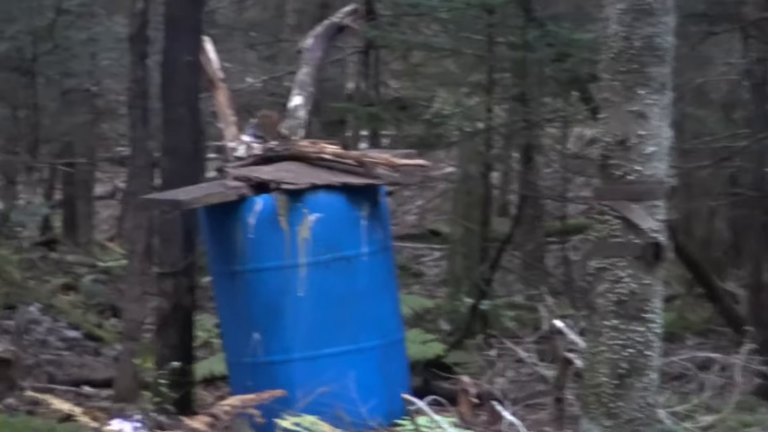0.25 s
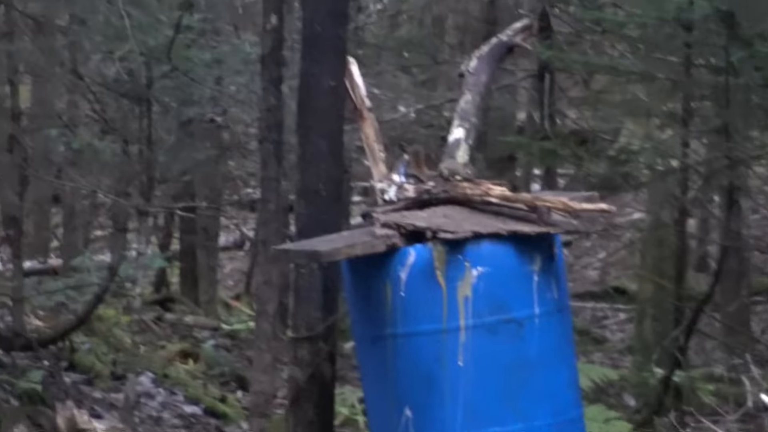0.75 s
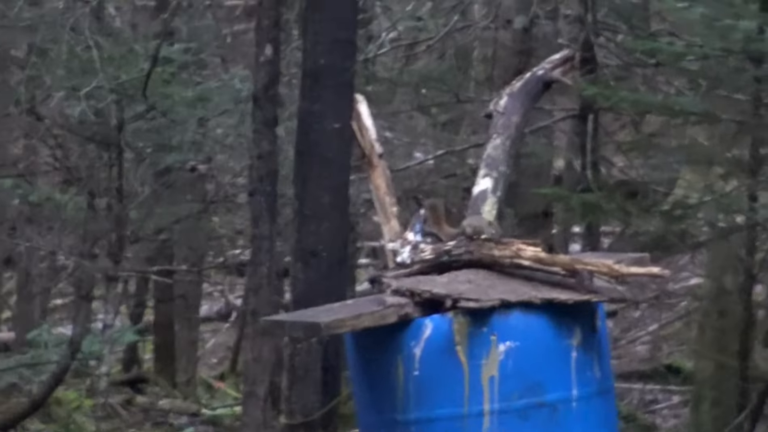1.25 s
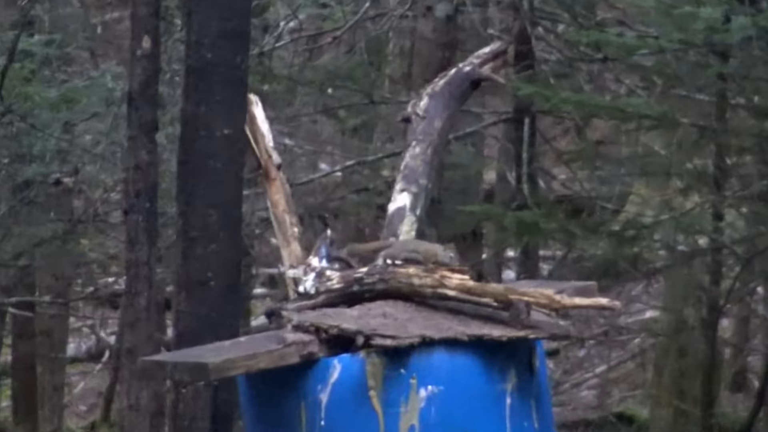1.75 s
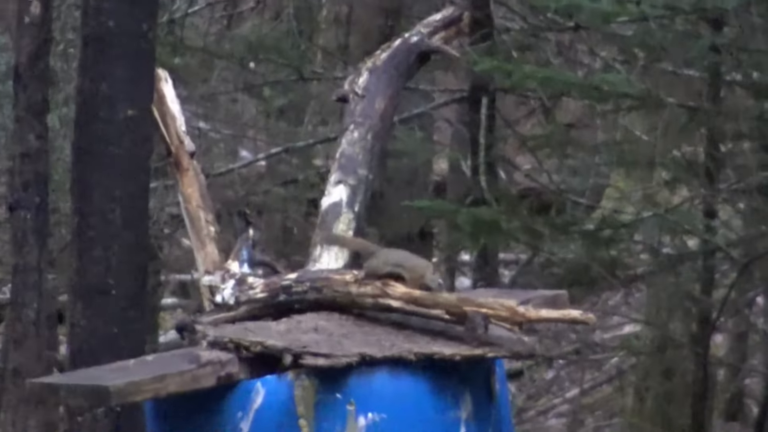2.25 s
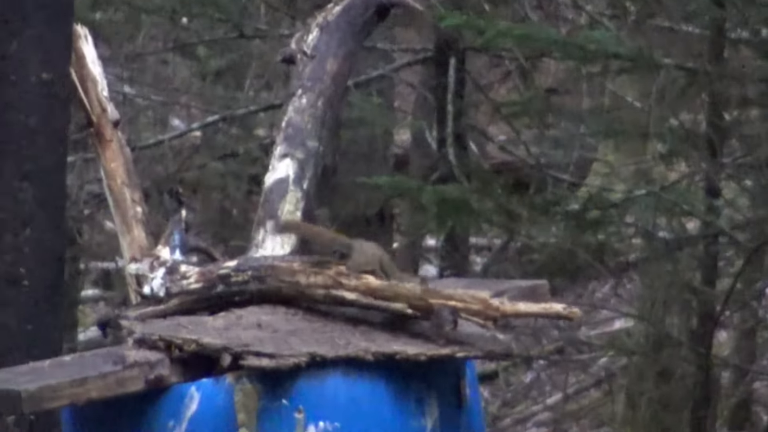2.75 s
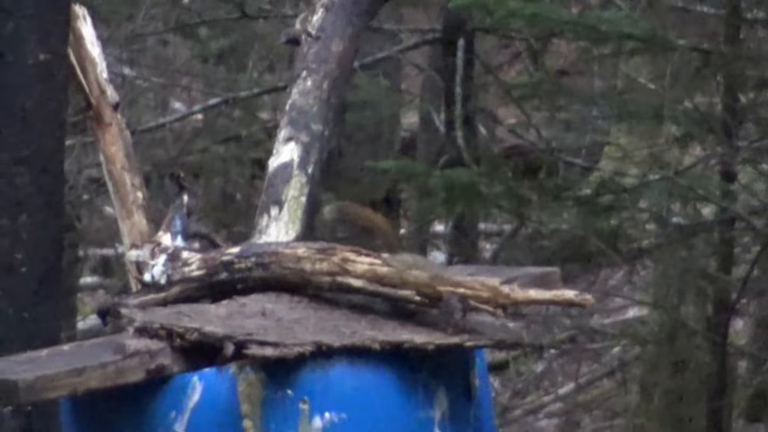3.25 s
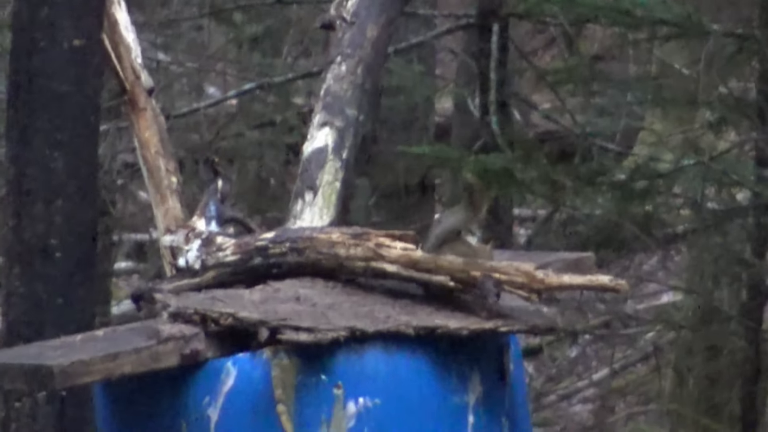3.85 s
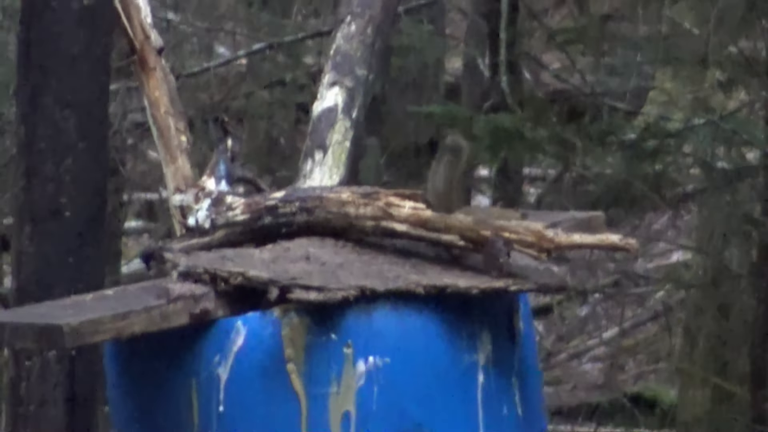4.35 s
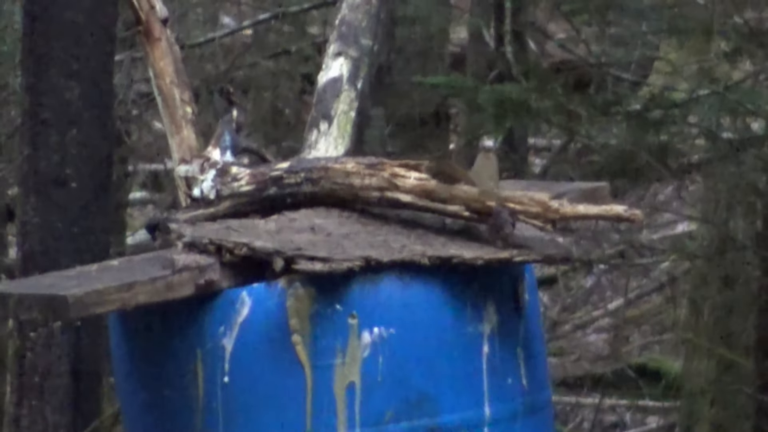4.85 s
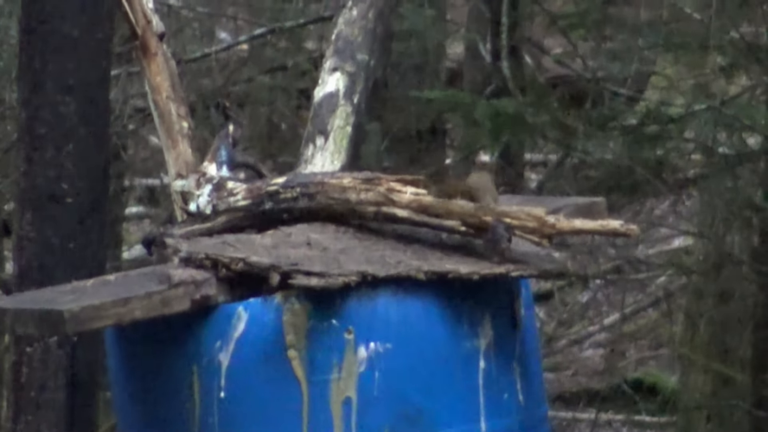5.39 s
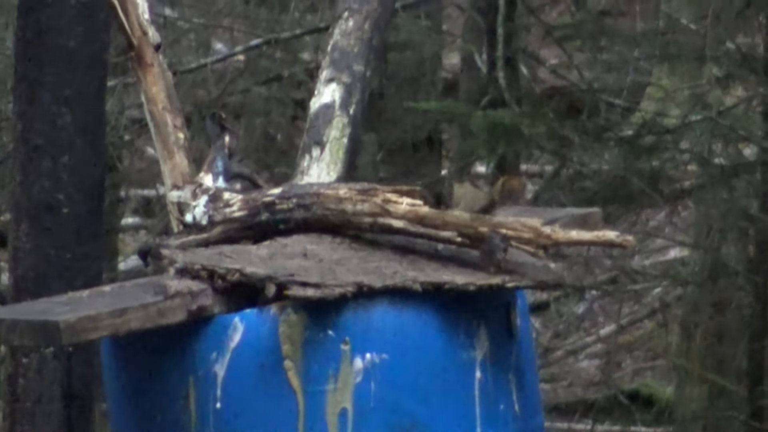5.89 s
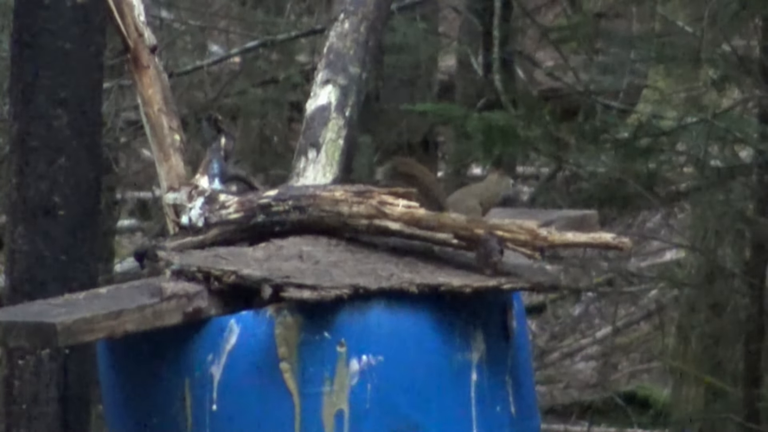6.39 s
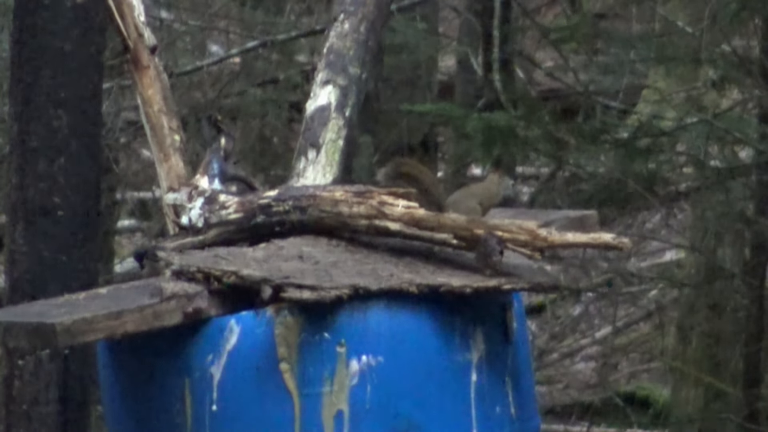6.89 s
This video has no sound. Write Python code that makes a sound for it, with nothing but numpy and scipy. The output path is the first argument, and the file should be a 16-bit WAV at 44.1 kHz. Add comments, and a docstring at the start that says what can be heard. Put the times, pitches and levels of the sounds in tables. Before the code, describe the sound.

Low wind rumble and occasional buffets hit a hand-held microphone over a faint forest hush. A nearby squirrel sounds five short, piercing alarm chirps, about one every second and a half, each with a raspy edge and a brief echo. A second squirrel calls faintly from far off before each one. Light rustling and dull knocks sound close by after the first chirp, and the wind dies down toward the end.

```python
"""Wind rumbles and buffets on the microphone over the hush of a conifer wood; something rustles close by.
A red squirrel calls from far off, and a near one at a feeder gives five alarm chirps in turn with it.
Each chirp is an arched whistle that breaks into a short bark, turbulent air shaped by the throat's
resonances. Trunks and twigs scatter the calls back, and knocks ring the body of the hand-held camera."""
import sys
import numpy as np
from scipy import signal
from scipy.fft import rfft, irfft, next_fast_len
from scipy.io import wavfile
from scipy.ndimage import uniform_filter1d

SR = 44100
rng = np.random.default_rng(int(sys.argv[2]) if len(sys.argv) > 2 else 0)


def to_wav(s):
    """Save 16-bit WAV."""
    ch = np.atleast_2d(s).T  # columns
    pcm = np.round(np.clip(ch, -1, 1) * 32767)  # PCM
    wavfile.write(sys.argv[1], SR, pcm.astype(np.int16))


N = 314433
TIME = np.arange(N) / SR


def amp(db):
    """Amplitude ratio of a level in decibels."""
    return 10 ** (np.asarray(db) / 20)


def unit_rms(x):
    """Normalisation to unit power."""
    return x / np.sqrt(np.mean(x ** 2) + 1e-20)


def curve_at(points, hz):
    """Interpolation on a logarithmic frequency axis."""
    f, value = np.transpose(points)
    return np.interp(np.log(hz + 1), np.log(f), value)


def add(mix, start_s, sound):
    """Superposition: a sound adds to the mix from its start time."""
    part = mix[max(round(start_s * SR), 0):][:len(sound)]
    part += sound[:len(part)]


def noise(spectrum):
    """Spectral shaping: white noise takes on a colour, at unit power."""
    size = next_fast_len(N)
    gain = amp(curve_at(spectrum, np.fft.rfftfreq(size, 1 / SR)))
    return unit_rms(irfft(rfft(rng.standard_normal(size)) * gain, size)[:N])


def wobble(size, rate_hz):
    """Random modulation: straight lines join Gaussian values drawn at the given rate."""
    return np.interp(np.arange(size) * rate_hz / SR, np.arange(4096), rng.standard_normal(4096))


# Spectra of the wind's rumble and flutter. Each row: frequency in Hz, relative density in dB.
RUMBLE_SPECTRUM = [(6, -30), (15, -2.5), (24, 0), (34, 0.5), (44, -5), (55, -11), (70, -31.5), (100, -36),
                   (150, -45), (300, -73), (1000, -100)]
FLUTTER_SPECTRUM = [(30, -44), (60, 3), (100, 2), (160, -5), (300, -24.5), (700, -43), (3000, -114)]
# The breeze, dying down towards the end. Each row: time in seconds, rumble level in dB.
BREEZE_LEVELS = [(0, -19.5), (1.6, -21.5), (1.8, -27.5), (2.05, -20.5), (5.15, -23), (5.7, -31.5),
                 (6.5, -32), (7.13, -41.5)]
# Gusts. Each row: peak time in seconds, rise above the breeze in dB, half width in seconds.
WIND_GUSTS = [(.25, 6, 0.048), (.46, 6.5, 0.034), (1.4, 2.5, 0.094), (2.42, 3, 0.16), (3.129, 7, 0.078),
              (4.85, 8.5, 0.23)]


def wind(flutter_db=-43, flutter_exponent=2.3, unrest_db=0.73):
    """Turbulence: eddies on the microphone swell with each gust, the flutter faster than the rumble."""
    gusts_db = sum(db * np.exp(-((TIME - s) / width) ** 2) for s, db, width in WIND_GUSTS)
    level_db = np.interp(TIME, *np.transpose(BREEZE_LEVELS)) + gusts_db + unrest_db * wobble(N, 8.8)
    eddies = noise(RUMBLE_SPECTRUM)
    eddies /= np.sqrt(uniform_filter1d(eddies ** 2, size=5000) + 1e-6)  # evens out chance swells
    flutter = amp(flutter_db + flutter_exponent * (level_db + 15.5)) * noise(FLUTTER_SPECTRUM)
    return amp(level_db) * eddies + flutter


# Likeness of left and right. Each row: frequency in Hz, correlation from 0 to 1.
CAPSULE_CORRELATION = [(100, 1), (500, 0.96), (3000, 0.97), (6000, 0.77), (14000, 0.44)]


def stereo_noise(spectrum):
    """Partial coherence: two close capsules receive nearly the same noise, less so in the treble."""
    size = next_fast_len(N)
    same = np.clip(curve_at(CAPSULE_CORRELATION, np.fft.rfftfreq(size, 1 / SR)), 0, 1)
    mid = irfft(rfft(noise(spectrum), size) * np.sqrt((1 + same) / 2), size)[:N]
    side = irfft(rfft(noise(spectrum), size) * np.sqrt((1 - same) / 2), size)[:N]
    return np.array([mid + side, mid - side])


# The wood's hush and the microphone's hiss. Each row: frequency in Hz, relative density in dB.
HUSH_SPECTRUM = [(20, -12.5), (70, -10.5), (97, -8), (145, -21.5), (300, -24), (650, -28.5), (1100, -32),
                 (1400, -36), (1900, -32.5), (3150, -32), (4000, -50.5), (6000, -61)]
HISS_SPECTRUM = [(1000, 0), (7500, 0), (11000, -4), (16000, -5.5)]


def hush_and_hiss(hush_db=-39, hiss_db=-53.8, flicker_db=.8):
    """Noise floor: the hush of the wood, a little to the right, adds to the microphone's self-noise."""
    hush = amp(hush_db + flicker_db * wobble(N, 12)) * stereo_noise(HUSH_SPECTRUM)
    return hush * amp([[-.6], [.6]]) + amp(hiss_db) * stereo_noise(HISS_SPECTRUM)


# Crackle and clicks at the microphone. Each row: frequency in Hz, relative density in dB.
CRACKLE_SPECTRUM = [(100, 5), (600, 7.5), (1300, -6), (2200, 4), (3600, -7), (6000, -6.5), (10000, -15),
                    (15000, -43)]
# Buffets. Each row: peak time in seconds, peak in dB, half width in seconds, flutter and crackle in dB.
WIND_BUFFETS = [(0.232, -14.5, 0.0039, -28.5, -80), (0.277, -6, 0.0042, -29, -75),
                (2.437, -15, 0.023, -26.5, -33), (3.12, -10, 0.0029, -22, -36),
                (3.717, -7.5, 0.0019, -22, -58), (3.749, -13, 0.0037, -25, -68),
                (3.798, -1.5, 0.0052, -24, -68), (4.799, -13, 0.01, -22.5, -69),
                (4.87, -22, 0.0021, -24.5, -36.5)]


def buffets(crackle_s=0.0097, flutter_s=0.011):
    """Pressure pulses: single pushes of air on the diaphragm, each with flutter and some with crackle."""
    out, crackle, flutter = np.zeros(N), noise(CRACKLE_SPECTRUM), noise(FLUTTER_SPECTRUM)
    for s, db, width, flutter_db, crackle_db in WIND_BUFFETS:
        span = abs(TIME - s) < .1
        t = TIME[span] - s
        push = amp(db) / (1 + (t / width) ** 2)
        shake = amp(flutter_db) * flutter[span] * np.exp(-abs(t) / flutter_s)
        out[span] += (push + shake) * np.hanning(len(t))
        out[span] += amp(crackle_db) * crackle[span] * np.exp(-abs(t) / crackle_s)
    return out


# Colour of a rustle. Each row: frequency in Hz, relative density in dB.
RUSTLE_SPECTRUM = [(500, -22), (2000, -11.5), (3500, -7.5), (7000, -1), (9500, -6.5), (12000, -13),
                   (16000, -27)]
# Rustles. Each row: peak time in seconds, level in dB, rough half width in seconds.
RUSTLE_SWELLS = [(.59, -56, 0.0057), (.78, -47, 0.069), (1.10, -47, 0.048), (1.373, -42.5, 0.014),
                 (1.442, -34, 0.011), (1.519, -53.5, 0.1), (2.72, -53.5, 0.17), (4.06, -50.5, 0.065),
                 (4.52, -74, 0.054), (5.63, -54.5, 0.018)]


def rustles(grain_db=3.0, spread=0.41):
    """Amplitude modulation: bright noise swells and flickers into grainy swishes close to the camera."""
    swell = sum(amp(db) / (1 + ((TIME - s) / width) ** 2 / 2) ** 1.08 for s, db, width in RUSTLE_SWELLS)
    grains = amp(grain_db * wobble(N, 400))
    common, left, right = (noise(RUSTLE_SPECTRUM) for _ in range(3))
    return swell * grains * (common + spread * np.array([left, right]))


def arch(length_s, hz, rise_s, scoop, sag, start_db, end_db):
    """Pitch and level contours of a note that scoops up and sags, each by a share of its crest pitch."""
    t = np.arange(0, length_s, 1 / SR)
    before = np.maximum(1 - t / rise_s, 0)
    after = np.maximum(t - rise_s, 0) / (length_s - rise_s)
    return hz * (1 - scoop * before - sag * after), start_db * before + end_db * after


def voice(hz, db, jitter, partials):
    """Additive synthesis: partials, each a pitch multiple and a level in dB, follow an unsteady pitch."""
    phase = 2 * np.pi * np.cumsum(hz * (1 + jitter * wobble(len(hz), 946))) / SR
    wave = sum(amp(level) * np.sin(k * phase) for k, level in partials)
    return np.sqrt(2) * amp(db) * wave * signal.windows.tukey(len(hz), .1)


def rasp(level_db, formants, grain_db=2.6, start_db=-9, rise_s=.011, fade_db_per_s=272, length_s=.053):
    """Source and filter: a grainy puff of turbulent air passes through the throat's resonances."""
    size = 4096
    hz, t = np.fft.rfftfreq(size, 1 / SR), np.arange(size) / SR
    power = sum(amp(db) ** 2 / (1 + (2 * (hz - f) / width) ** 2) ** 2 for f, width, db in formants)
    turbulence = rng.standard_normal(size) * amp(grain_db * wobble(size, 733))
    puff = unit_rms(irfft(rfft(turbulence) * np.sqrt(power)))
    swell_db = start_db * np.maximum(1 - t / rise_s, 0) - fade_db_per_s * np.maximum(t - rise_s, 0)
    return puff * amp(level_db + swell_db) * (t < length_s)


def squeal(length_s, hz, jitter, glide=0):
    """Frequency modulation: jitter roughens a short tone that swells and fades, with an optional glide."""
    size = round(length_s * SR)
    pitch = hz * (1 + glide * np.linspace(-.5, .5, size) + jitter * wobble(size, 720))
    swell = np.sin(np.linspace(0, np.pi, size))
    return np.sqrt(2) * swell * np.sin(2 * np.pi * np.cumsum(pitch) / SR)


# The far squirrel's throat resonances. Each row: centre in Hz, width in Hz, relative level in dB.
FAR_FORMANTS = [(3700, 800, -2), (5000, 480, 2), (7160, 1500, -15), (10500, 4800, -10)]
# Its calls. Each row: start in seconds, pitch in Hz, level in dB, undertone level in dB,
# second note's pitch in Hz and level in dB.
FAR_CALLS = [(0.719, 5750, -41.5, -60, 6500, -60), (2.633, 5680, -42, -52, 6400, -54),
             (4.372, 5660, -42, -52, 6370, -45), (5.982, 5620, -42.5, -49, 6620, -51)]


def far_squirrel(octave_db=-18, rasp_db=-5, puff_db=-9, undertone_hz=3720):
    """Tone and turbulence: a flat whistle with a puff and a rough undertone, then a rasp and high note."""
    out = np.zeros(N)
    for s, hz, db, undertone_db, second_hz, second_db in FAR_CALLS:
        call = arch(.043, hz, rise_s=.0064, scoop=.013, sag=.006, start_db=-2, end_db=1)
        add(out, s, amp(db) * voice(*call, jitter=.012, partials=[(1, 0), (2, octave_db)]))
        add(out, s, rasp(db + puff_db, FAR_FORMANTS))
        add(out, s, amp(undertone_db) * squeal(0.074, undertone_hz, jitter=0.089))
        add(out, s + .032, amp(second_db) * squeal(.025, second_hz, jitter=.014))
        add(out, s + 0.025, rasp(db + rasp_db, FAR_FORMANTS))
    return out


# Reverberation of the wood and of the undergrowth. Each row: frequency in Hz, 60 dB decay in seconds.
WOOD_DECAY = [(500, 0.57), (3000, 1), (6000, 0.88), (9000, 0.51), (15000, 0.04)]
BRUSH_DECAY = [(500, 0.089), (3000, 0.43), (6000, 0.36), (9000, 0.61), (15000, 0.19)]


def scatter(x, decay, build_s, spread):
    """Multiple scattering: sparse echoes from trunks and twigs build up, then die band by band."""
    count = SR // 20
    taps = np.zeros((3, SR))
    arrivals = np.arange(count) * 20 + rng.integers(0, 20, (3, count))
    np.put_along_axis(taps, arrivals, rng.choice([-1., 1.], (3, count)), 1)
    hz, t, bands = signal.stft(taps, SR, nperseg=256)
    envelope = amp(-60 * t / curve_at(decay, hz)[:, None]) * (1 - np.exp(-t / build_s))
    tails = signal.istft(bands * envelope, SR, nperseg=256)[1]
    tails = tails[0] + spread * tails[1:]  # the two capsules sit close and hear nearly the same
    return signal.fftconvolve(x[None], tails / np.linalg.norm(tails[0]), axes=1)[:, :N]


LEAD_S, LEAD_DROP, LEAD_GLIDE_PER_S = .006, 0.2195, 28.6  # drop and glide are shares of the pitch
JUMP_S, CLIMB_SHARE = 0.0013, 0.72  # the climb takes this share of the whistle's length
BREAK_S, BREAK_DB, SAG_S = 0.00095, -15, .006


def whistle_contour(length_s, hz, lead_db, scoop, start_db, hoarseness=.045, sag=0.25):
    """Register change: pitch and level jump from a hoarse low lead-in, climb, then break and sag."""
    t = np.arange(-LEAD_S, length_s + SAG_S, 1 / SR)
    low = np.clip(1 - t / JUMP_S, 0, 1)
    climb_left = np.clip(1 - t / (CLIMB_SHARE * length_s), 0, 1) ** 1.49
    swell_left = np.clip(1 - t / length_s, 0, 1) ** 2.6
    after = np.maximum(t - length_s, 0)
    broken = np.minimum(after / BREAK_S, 1)
    hoarse = hoarseness * np.maximum(low, broken) * wobble(len(t), 1500)
    register = 1 - low * (LEAD_DROP - LEAD_GLIDE_PER_S * t)
    pitch = hz * (1 - scoop * climb_left - sag * after / SAG_S + hoarse) * register
    return pitch, start_db * swell_left + lead_db * low + BREAK_DB * broken


# The near squirrel's throat resonances. Each row: centre in Hz, width in Hz, relative level in dB.
NEAR_FORMANTS = [(1200, 100, 7), (3150, 1400, 5.5), (4930, 3000, 2), (5600, 1100, 5), (6970, 570, 4),
                 (7830, 1800, 0.5), (9100, 1700, -2), (11000, 1700, -3.5), (13100, 2000, -4),
                 (15300, 800, -15)]
# Its chirps. Each row: start in seconds, pitch in Hz, whistle length in seconds, level in dB, lead-in
# offset in dB, upward scoop as a share of the pitch, starting offset in dB, held whistle level in dB,
# bark delay in seconds, bark level in dB, yelp pitch in Hz, whistle's gain into the wood in dB.
NEAR_CHIRPS = [(0.9305, 6200, .045, -22, -15, .11, -14, -31, .057, -28, 1060, -2),
               (2.3065, 6090, .0355, -21.5, -13, .1, -15, -29, .049, -27, 1240, -1.5),
               (3.698, 6240, .0315, -22, -12, .12, -13, -44, .058, -44, 1000, 1.5),
               (5.1175, 6110, .0335, -20.3, -6, .08, -10, -24, .048, -29, 1100, -2.5),
               (6.6195, 6130, .0355, -21, -7, .075, -8, -21.5, .048, -28.5, 1130, -2.5)]
# Overtones in every bark. Each row: delay and length in seconds, pitch in Hz, dB relative to the bark.
BARK_OVERTONES = [(.001, .014, 9870, -10), (.003, .03, 13450, -19), (.015, .024, 7080, -18)]
# Squeaks where the voice catches. Each row: start and length in seconds, pitch in Hz,
# glide as a share of the pitch, level in dB.
BARK_SQUEAKS = [(1, 0.012, 2876, -0.048, -32), (1.004, 0.02, 3350, -0.053, -35.5),
                (2.362, 0.019, 7200, 0.01, -34), (2.378, 0.012, 2900, -0.22, -33.5),
                (2.382, 0.019, 3414, 0.079, -30.5), (3.718, .016, 12500, .02, -48),
                (3.756, 0.033, 3440, -0.099, -42.5), (5.167, .014, 3310, -0.075, -36.5),
                (5.187, 0.0065, 3460, 0.32, -26.5), (6.671, 0.018, 3383, 0.012, -32.5),
                (6.686, 0.013, 3750, 0.41, -33.5), (6.697, 0.011, 2794, -0.046, -34.5)]
BEAT_HZ, BEAT_WANDER, TWIN_DB = 160, .35, -8.5
HELD_GAP_S, OVERTONE_DETUNE, OVERTONE_SPREAD_DB = .0042, .012, 3


def near_squirrel(subharmonic_db=-23, octave_db=-46, breath_db=-27, rasp_db=-4, yelp_db=-10):
    """Beating: two close tones form a whistle that breaks, then resumes over a bark, yelp and squeaks."""
    whistles, barks, yelps = np.zeros((3, N))
    partials = [(.5, subharmonic_db), (1, 0), (2, octave_db)]
    for s, hz, length, db, lead_db, scoop, start_db, held_db, delay, bark_db, yelp_hz, _ in NEAR_CHIRPS:
        pitch, level_db = whistle_contour(length, hz, lead_db, scoop, start_db)
        twin = pitch - BEAT_HZ * (1 + BEAT_WANDER * wobble(len(pitch), 121))
        held = arch(0.0314, hz, rise_s=0.0068, scoop=0.02, sag=0.013, start_db=-2, end_db=-10.5)
        yelp = arch(.025, yelp_hz, rise_s=.009, scoop=.45, sag=.32, start_db=-4, end_db=-5)
        add(whistles, s - LEAD_S, voice(pitch, db + level_db, jitter=.008, partials=partials))
        add(whistles, s - LEAD_S, voice(twin, db + level_db, jitter=.008, partials=[(1, TWIN_DB)]))
        add(whistles, s + length + HELD_GAP_S, amp(held_db) * voice(*held, 0.015, partials))
        bark_s = s + delay
        add(yelps, bark_s, amp(bark_db + yelp_db) * voice(*yelp, jitter=.04, partials=[(1, 2), (2, -34)]))
        add(barks, bark_s, rasp(bark_db + rasp_db, NEAR_FORMANTS))
        for lag, span, overtone_hz, overtone_db in BARK_OVERTONES:
            detune, accent = rng.uniform(-1, 1, size=2)
            overtone = squeal(span, overtone_hz * (1 + OVERTONE_DETUNE * detune), jitter=.018)
            add(barks, bark_s + lag, amp(bark_db + overtone_db + OVERTONE_SPREAD_DB * accent) * overtone)
    for s, length, hz, glide, db in BARK_SQUEAKS:
        add(barks, s, amp(db) * squeal(length, hz, jitter=.028, glide=glide))
    flow = uniform_filter1d(abs(whistles), size=200)  # the air that drives the whistle also hisses
    breath = flow * noise([(1500, -42), (4000, 9.5), (7000, -8), (11000, 3.0), (16000, -23)])
    return whistles + yelps + amp(breath_db) * breath, barks


# Reflections from near trunks. Each row: delay in seconds, gain in dB.
TRUNK_ECHOES = [(.0031, -16), (.0094, -16), (0.0137, -14), (0.028, -15), (.041, -17), (.066, -25)]


def trunks(x):
    """Interference: single echoes add to the direct sound and beat against its gliding pitch."""
    out = x.copy()
    for delay, db in TRUNK_ECHOES:
        add(out, delay, amp(db) * x)
    return out


def thicket(x, delay_s=.13, echo_db=-19):
    """Diffuse reflection: a dense stand of trees returns a late, blurred echo."""
    late = np.zeros(N)
    add(late, delay_s, amp(echo_db) * x)
    return scatter(late, BRUSH_DECAY, build_s=0.0046, spread=.05)


# Modes of the camera body. Each row: frequency in Hz, relative level in dB, 60 dB decay in seconds.
CAMERA_MODES = [(110.7, -3.5, 0.12), (194.4, 3.5, 0.085), (243, -21.5, 0.27), (398, -3.5, 0.042),
                (496, 0, 0.017), (626, -35, 0.011)]
# Knocks on it. Each row: start in seconds, ring gain in dB, scuff gain in dB.
CAMERA_KNOCKS = [(1.161, -21.5, -42), (1.223, -25.5, -46), (1.312, -15.5, -35.5), (3.114, -27, -31.5),
                 (3.706, -30, -23.5), (3.714, -24, -57)]


def knocks(scuff_s=0.0064, scuff_rise_s=0.0037, ring_rise_s=0.00097):
    """Modal vibration: each dull knock rings the camera body's damped modes, with a brief scuff."""
    out, t = np.zeros(N), np.arange(8000) / SR
    modes = sum(amp(db - 60 * t / t60) * np.sin(2 * np.pi * hz * t) for hz, db, t60 in CAMERA_MODES)
    ring = -modes * (1 - np.exp(-t / ring_rise_s))
    scuff_envelope = 2 * np.exp(-t / scuff_s) * (1 - np.exp(-t / scuff_rise_s))
    crackle = noise(CRACKLE_SPECTRUM)
    for s, ring_db, scuff_db in CAMERA_KNOCKS:
        scuff = crackle[round(s * SR):][:len(t)] * scuff_envelope
        add(out, s, amp(ring_db) * ring + amp(scuff_db) * scuff)
    return out


def scene(near_wet_db=-13.0, brush_db=-7, far_wet_db=-1, far_direct_db=-8):
    """Superposition: direct and scattered calls add to the wind, hush and handling at the microphone."""
    (whistles, barks), far = near_squirrel(), far_squirrel()
    near = trunks(whistles) * amp([[-1.5], [1.2]]) + trunks(barks) * amp([[-.4], [.3]])
    # Directivity: the way the squirrel faces sets how much of each whistle goes into the trees.
    facing = amp(np.interp(TIME, [row[0] for row in NEAR_CHIRPS], [row[-1] for row in NEAR_CHIRPS]))
    wood = scatter(facing * whistles + barks, WOOD_DECAY, build_s=0.031, spread=0.05)
    echoes = amp(near_wet_db) * wood * amp([[-.8], [.8]])
    echoes += amp(brush_db) * scatter(barks, BRUSH_DECAY, build_s=0.015, spread=0.23)
    echoes += thicket(facing ** 2 * whistles)
    far_echoes = scatter(far, WOOD_DECAY, build_s=0.01, spread=0.048)
    replies = amp(far_direct_db) * far + amp(far_wet_db) * far_echoes
    return near + echoes + replies + wind() + buffets() + knocks() + rustles() + hush_and_hiss()


def record(dry, cutoff_hz=15750):
    """Soft saturation rounds the strongest buffet just under full scale; a low-pass limits the band."""
    rounded = dry / (1 + dry ** 8) ** (1 / 8)
    lowpass = signal.firwin(511, cutoff_hz, window=("kaiser", 9), fs=SR)
    return signal.oaconvolve(rounded, lowpass[None], "same")


dry = scene()
out = record(dry)
to_wav(out)
```